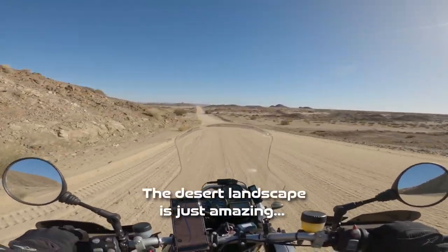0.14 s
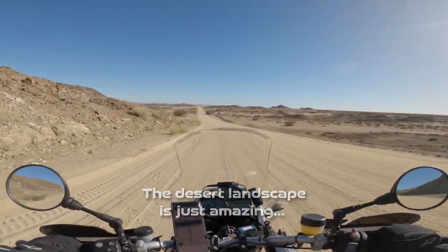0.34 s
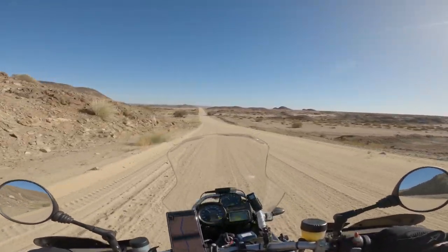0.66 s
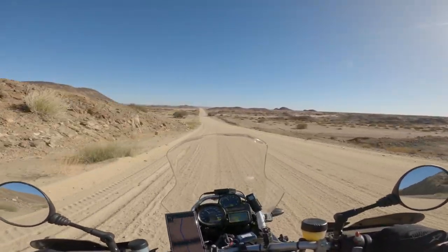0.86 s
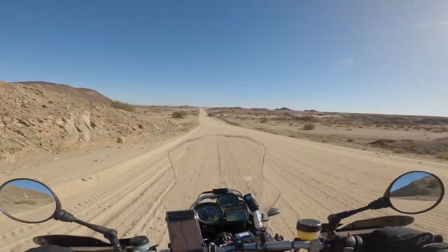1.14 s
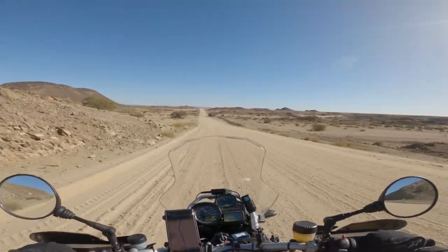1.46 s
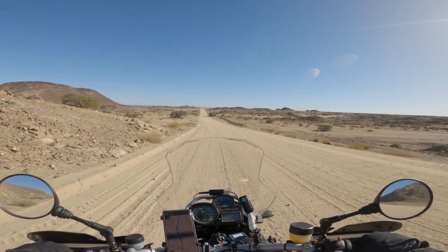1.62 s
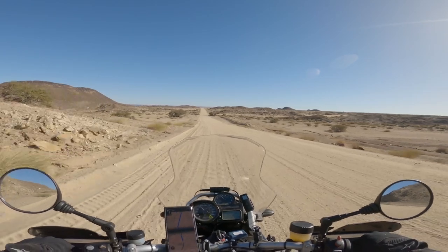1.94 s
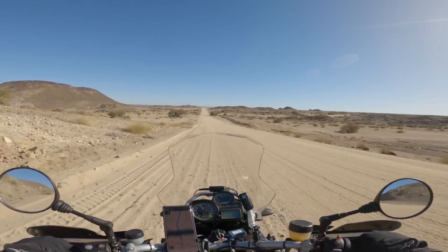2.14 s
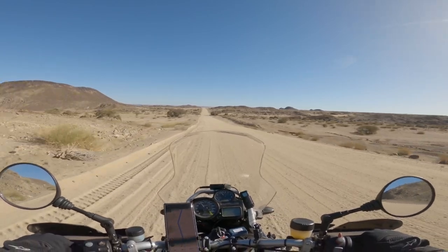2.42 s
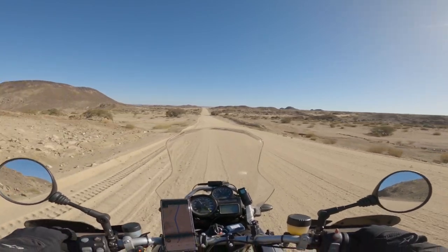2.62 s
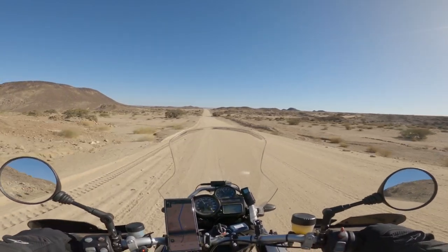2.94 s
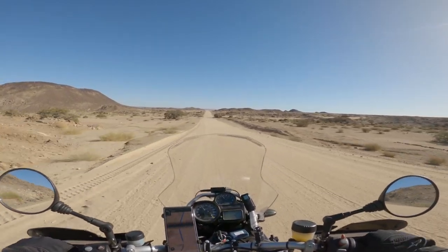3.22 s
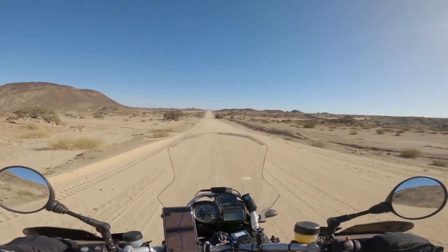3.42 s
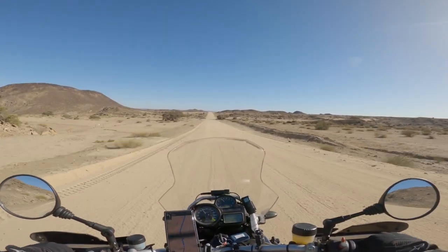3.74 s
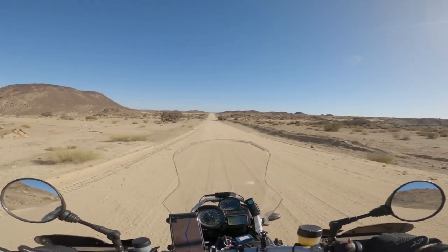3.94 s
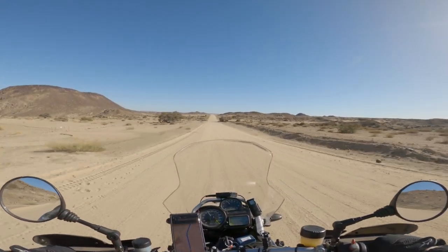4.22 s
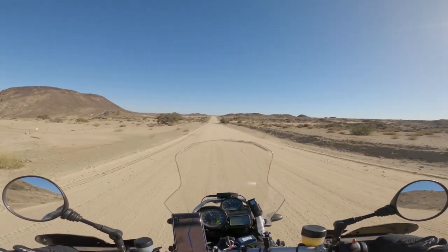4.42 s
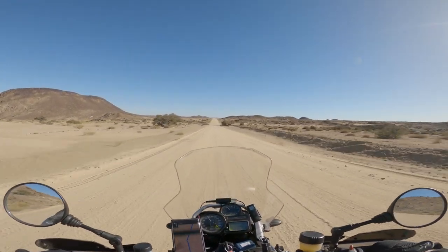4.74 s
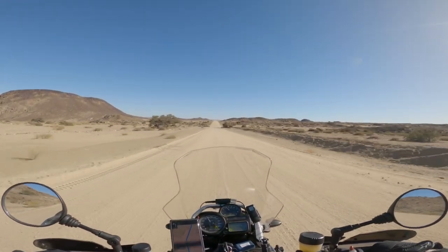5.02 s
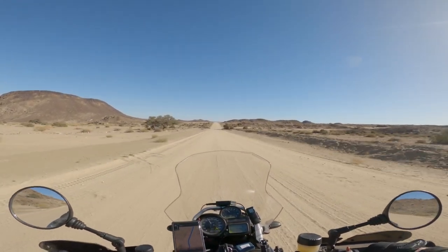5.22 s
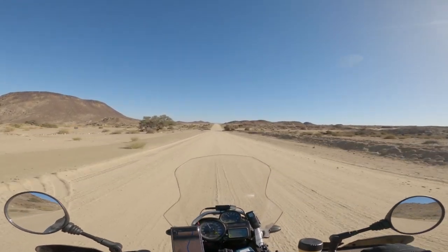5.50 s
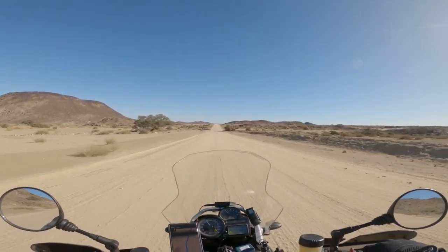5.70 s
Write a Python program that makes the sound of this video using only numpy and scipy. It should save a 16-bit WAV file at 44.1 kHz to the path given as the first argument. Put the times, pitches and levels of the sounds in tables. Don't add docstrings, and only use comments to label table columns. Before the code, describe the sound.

Onboard a motorcycle on dry gravel: low engine drone, thumping wind, gritty tyre roar, dull stone knocks, then a lower note with gear whine.

```python
import sys
import numpy as np
from scipy import signal
from scipy.fft import rfft, irfft, next_fast_len
from scipy.io import wavfile
from scipy.ndimage import uniform_filter1d, map_coordinates

SR = 44100
rng = np.random.default_rng(int(sys.argv[2]) if len(sys.argv) > 2 else 0)


def master_out(mix):
    frames = np.transpose(np.atleast_2d(mix))
    ceiling = np.clip(frames, -1, 1)
    pcm = np.round(ceiling * 32767).astype(np.int16)
    wavfile.write(sys.argv[1], SR, pcm)


def voltage_ratio(decibels):
    exponent = np.asarray(decibels, float) / 20
    return 10 ** exponent


N = 258867

# (time [s], firing rate [1/s], exhaust level [dB], whine level [dB])
ENGINE_RUN = [(0, 53.5, -30, -58), (.5, 55, -30, -58), (1.2, 56, -34, -58), (2.2, 56.5, -34, -60),
              (3.3, 57, -34, -60), (3.45, 52.2, -30, -53), (3.8, 52.5, -29, -48), (4.3, 53.1, -29, -46),
              (4.7, 53.6, -29, -47), (5.2, 54, -31, -51), (5.87, 54.6, -33, -54)]
# (frequency [Hz], level [dB per Hz])
GRIT_COLOUR = [(900, -54), (1500, 0), (2300, 1.5), (2800, -0.5), (3500, -6), (4300, -13.5), (5300, -28.5),
               (8000, -120)]
# (frequency [Hz], level [dB per Hz])
FIZZ_COLOUR = [(2500, -68), (4500, -10), (5300, -3), (6300, -2), (7500, -5), (9800, -9), (10500, -12.5),
               (12300, -16.5), (12800, -25), (13400, -18), (14000, -23), (15500, -32), (17000, -120)]


def unit(x):
    return x / np.sqrt(np.mean(x ** 2) + 1e-20)


def curves(rows):
    s, *cols = np.transpose(rows)
    return [np.interp(np.arange(N) / SR, s, c) for c in cols]


def wobble(rate):
    knots = rng.standard_normal(int(N * rate / SR) + 4)
    return map_coordinates(knots, [np.arange(N) * rate / SR])


def flutter(rate):
    x = wobble(rate)
    return unit(x - uniform_filter1d(x, size=SR // 14))


def coloured(x, spectrum):
    m = next_fast_len(N + 8192)
    hz, db = np.transpose(spectrum)
    log_hz = np.log(np.fft.rfftfreq(m, 1 / SR) + 1)
    gain = voltage_ratio(np.interp(log_hz, np.log(hz + 1), db))
    return unit(irfft(rfft(x, m) * gain, m)[:N])


def patchy(depth_db):
    z = signal.stft(rng.standard_normal(N + 512), nperseg=512)[2]
    field = uniform_filter1d(rng.standard_normal(z.shape), size=8, axis=0)
    field = uniform_filter1d(field, size=6, axis=1)
    return signal.istft(z * voltage_ratio(depth_db * unit(field)), nperseg=512)[1][:N]


def impacts(spread_db, count):
    at, size, sign = rng.random((count, 3)).T
    height = voltage_ratio(-spread_db * np.log(size + 0.013)) * np.sign(sign - .5)
    return unit(np.bincount((at * N).astype(int), height, N))


def at_random(level_db, spread_db, count):
    at, size = rng.random((count, 2)).T
    return np.c_[at * N / SR, level_db + spread_db * (2 * size - 1)]


def nearby(s, reach_s):
    span = slice(max(round((s - reach_s) * SR), 0), min(round((s + reach_s) * SR), N))
    return span, np.arange(span.start, span.stop) / SR - s


def rise(t, time_s):
    return 1 - np.exp(-t / time_s)


def wind():
    # (time [s], buffet level [dB])
    gusts = [(0, -28), (.6, -26.5), (1.2, -29), (1.8, -29), (2.4, -28), (3, -27.5), (3.4, -27),
             (3.8, -24.5), (4.3, -28), (4.8, -26), (5.3, -27), (5.87, -24.5)]
    # (frequency [Hz], level [dB per Hz])
    buffet_colour = [(4, -10), (9, -3.5), (20, -7), (40, -5), (65, -2), (100, -7.5), (150, -13), (200, -17),
                     (260, -51), (440, -120)]
    lumps = voltage_ratio(1.4 * wobble(14))
    turbulence = unit(lumps * coloured(rng.standard_normal(N), buffet_colour))
    return voltage_ratio(curves(gusts)[0] + 2.5) * turbulence


def puffs():
    # (time [s], depth [dB], width [ms])
    eddy_rows = [(0.019, -2.5, 24), (0.313, -3, 12), (0.37, -4, 14), (0.51, -8, 34), (0.598, -7, 15),
                 (0.629, -10, 34), (0.894, -5, 13), (0.921, -10, 11), (1.158, -6, 9.5), (1.335, -10, 18),
                 (1.412, -6, 21), (1.451, -3, 15), (1.606, -2.3, 8.4), (2.139, -9, 13), (2.222, -11, 27),
                 (2.251, -7, 13), (2.647, -11, 13), (2.67, -11, 25), (2.767, -7, 8), (3.134, -4.5, 4.7),
                 (3.691, -3.5, 11), (3.727, -5.5, 8.7), (3.784, -4.3, 5), (3.875, -13, 27),
                 (3.982, -13, 25), (4.009, -8.9, 12), (4.068, -3.5, 5.9), (4.158, -6, 21),
                 (4.229, -12, 22), (4.261, -8, 8.8), (4.35, 0.5, 14.4), (4.404, -6.5, 18),
                 (4.427, -4, 4.2), (4.452, -7.1, 15), (4.48, -4.5, 18), (4.61, -1, 13), (4.664, -7.8, 22),
                 (4.706, -2, 12.6), (4.756, -7, 14), (4.797, 0.5, 15), (4.855, -7, 6.9), (4.915, -4, 19),
                 (4.95, -6.9, 8.5), (5.011, -3.5, 22), (5.052, -6, 7), (5.075, -10.3, 23),
                 (5.093, -5.7, 6.7), (5.114, -5, 9.3), (5.19, -10.5, 14), (5.284, -3.5, 6.6),
                 (5.32, -2.5, 5), (5.353, 0.5, 14), (5.41, -5.3, 22), (5.462, -6, 24),
                 (5.509, -0.4, 11.6), (5.7, -1, 18),
                 (0.117, -7.5, 6), (0.154, -8, 5), (0.177, -6.5, 7.9), (0.268, -10, 7), (0.34, -9, 4.9),
                     (0.796, -15.3, 24), (0.85, -11, 8), (0.905, -16, 23), (1.141, -15.7, 25),
                     (1.212, -8, 8), (1.239, -10.2, 12), (1.275, -12, 25), (1.375, -8, 9.1),
                     (1.661, -9, 13), (1.761, -11, 33), (2.104, -13, 13), (2.286, -13.0, 11),
                     (2.429, -14, 21), (2.79, -16, 9.5), (3.082, -8, 3.6), (3.156, -8.5, 4.7),
                     (3.178, -9, 5.2), (3.228, -8, 11), (3.319, -10.8, 10), (3.351, -11, 12),
                     (3.569, -9.2, 4.4), (3.649, -9.5, 15), (3.706, -14, 7), (3.796, -5.5, 5.6),
                     (3.893, -9, 5.6), (3.922, -14, 11), (3.935, -5, 4.5), (4.088, -12.6, 10),
                     (4.141, -5.5, 5), (4.209, -12, 6.7), (4.297, -9.0, 8.2), (4.334, -8.1, 5.8),
                     (4.368, -9.2, 11), (4.39, -12, 8), (4.468, -15, 30), (4.65, -5, 5.2), (4.722, -13, 25),
                     (4.81, -9, 8), (4.875, -10, 6.5), (4.891, -11, 6.7), (4.986, -11, 21),
                     (5.132, -7.5, 5), (5.148, -6, 5), (5.226, -8, 11), (5.294, -14.7, 27),
                     (5.366, -14, 21), (5.438, -8, 4.5), (5.473, -14, 8), (5.533, -9, 7), (5.55, -5, 6),
                     (5.569, -10.5, 6.5), (5.595, -8.5, 5.3), (5.666, -6.5, 5.5), (5.827, -15, 25),
                     (5.87, -8, 4.2)]
    out = np.zeros(N)
    for s, db, ms in eddy_rows:
        span, t = nearby(s, ms / 150)
        suck = np.exp(-(t / (ms * 0.00058)) ** 2)
        rebound = np.exp(-(t / (3 * ms * 0.00058)) ** 2) / 3
        out[span] += voltage_ratio(db) * (rebound - suck)
    return out


def squeaks():
    # (time [s], peak level [dB])
    chirps = [(0.4648, -69), (0.5372, -70), (0.6469, -67), (0.6918, -73), (0.7557, -68), (1.1528, -70),
              (1.3763, -75), (3.5688, -71), (4.2552, -71), (4.349, -72), (4.4433, -73), (4.5521, -70)]
    squeak_hz, t60_s = 13320, .15
    out, t = np.zeros(N + SR), np.arange(SR // 10) / SR
    for (s, db), bend in zip(chirps, rng.standard_normal(len(chirps))):
        fade = voltage_ratio(db - 5 - 60 * t / t60_s) * rise(t, 0.003)
        tone = np.sin(2 * np.pi * squeak_hz * (1 + 0.005 * bend) * t)
        out[round(s * SR):][:len(t)] += fade * tone
    return out[:N]


def pings():
    # (time [s], peak level [dB])
    tick_rows = [(5.2444, -49), (5.3154, -48), (5.3527, -44), (5.3722, -50), (5.4016, -46), (5.4224, -48),
                 (5.4535, -48), (5.4654, -47), (5.5094, -46), (5.5308, -43), (5.5454, -48), (5.5648, -43),
                 (5.6194, -52), (5.6644, -52), (5.6915, -48)]
    centre_hz, width_hz, t60_s = 8500, 3400, .022
    out, t = np.zeros(N + SR), np.arange(SR // 50) / SR
    for (s, db), noise in zip(tick_rows, rng.standard_normal((len(tick_rows), len(t)))):
        out[round(s * SR):][:len(t)] += voltage_ratio(db - 3.0 - 60 * t / t60_s) * noise
    edges_hz = [centre_hz - width_hz / 2, centre_hz + width_hz / 2]
    band = signal.butter(2, edges_hz, "band", fs=SR, output="sos")
    return voltage_ratio(7.5) * signal.sosfilt(band, out[:N])


def tread_hum():
    # (time [s], tread block rate [1/s], hum level [dB])
    tread_run = [(0, 290, -30), (.4, 270, -32.5), (1.4, 286, -33), (2.3, 291, -39), (3.2, 290, -35.5),
                 (3.5, 273, -30.5), (3.7, 301, -35), (4.6, 312, -36), (4.9, 295, -42), (5.3, 293, -39),
                 (5.87, 270, -40)]
    hz, db = curves(tread_run)
    phase = 2 * np.pi * np.cumsum(hz) / SR + 1.03 * wobble(14)
    return np.sqrt(2) * voltage_ratio(db + 2.5 * wobble(7.6)) * np.sin(phase)


def crank():
    firing_hz = curves(ENGINE_RUN)[0] * (1 + 0.00318 * wobble(6))
    return 2 * np.pi * np.cumsum(firing_hz) / SR


def engine(turn):
    # (multiple of the firing rate [ratio], level [dB])
    firing_orders = [(1, 0.5), (2, 0), (3, -12.5), (4, -9.5), (5, -14.5), (7.5, -8.5)]
    gear_teeth = 25
    exhaust_db, whine_db = curves(ENGINE_RUN)[1:]
    exhaust = sum(voltage_ratio(db + 2.5 * wobble(5.01)) * np.sin(k * turn + k) for k, db in firing_orders)
    whine = voltage_ratio(1.3 * wobble(14) + 3.0) * np.sin(gear_teeth * turn + 1.0 * wobble(25))
    return np.sqrt(2) * (voltage_ratio(exhaust_db) * exhaust + voltage_ratio(whine_db) * whine)


def rattles():
    # (time [s], peak level [dB])
    clack_rows = [(0.2892, -31), (0.3835, -31), (0.413, -34), (0.229, -44), (1.7205, -30), (1.8218, -30),
                  (1.8726, -33), (1.928, -34), (2.387, -33), (2.4264, -29), (2.6723, -33), (3.3119, -32),
                  (3.503, -43), (4.244, -39), (4.4772, -27), (4.9561, -30), (5.0245, -26), (5.0863, -38),
                  (5.1422, -23.5), (5.1811, -33), (5.2604, -36), (5.3153, -22), (5.3562, -28),
                  (5.4261, -27), (5.459, -24), (5.4944, -26), (5.5278, -29), (5.5987, -25.5),
                  (5.6476, -29), (5.8117, -31)]
    # (time [s], peak level [dB])
    more_clacks = [(0.6175, -37), (2.134, -34), (2.1725, -32), (2.3066, -32), (2.4654, -37), (2.813, -41),
                   (3.0922, -35), (3.2191, -36), (3.268, -36), (3.4211, -33), (3.7435, -33), (3.9494, -33),
                   (4.2178, -38), (4.345, -27), (4.8516, -36), (5.1083, -32), (5.185, -35), (5.5445, -29),
                   (5.5638, -32), (5.6204, -28), (5.67, -29), (5.6994, -32), (5.7244, -31), (5.795, -27),
                   (5.8391, -33)]
    fittings_hz = [2230, 2670, 2800]
    ticks_db, sizzle_db, sizzle_follows = -41, -58, .3
    ring, spit, sizzle = np.zeros((3, N + SR))
    t = np.arange(SR // 20) / SR
    faint_ticks = at_random(ticks_db, 2.5, count=30)
    clacks = np.r_[clack_rows, more_clacks, faint_ticks]
    for (s, db), which in zip(clacks, rng.random(len(clacks))):
        hz = fittings_hz[int(which * len(fittings_hz))]
        under_db = sizzle_db + sizzle_follows * (db - ticks_db) - db
        fade = voltage_ratio(db - 60 * t / 0.023) * rise(t, 0.00023)
        start = round(s * SR)
        ring[start:][:len(t)] += fade * voltage_ratio(-4.0 - 60 * t / 0.033) * np.sin(2 * np.pi * hz * t)
        spit[start:][:len(t)] += voltage_ratio(-3.5) * fade
        sizzle[start:][:len(t)] += voltage_ratio(under_db - 1.5) * fade
    noise = rng.standard_normal(N)
    gritty = spit[:N] * coloured(noise, GRIT_COLOUR)
    bright = sizzle[:N] * coloured(noise, FIZZ_COLOUR)
    return ring[:N] + gritty + bright


def stones():
    # (time [s], peak level [dB], ring [Hz])
    large_stones = [(0.097, -2.5, 277), (0.411, 0, 392), (0.5, -8, 496), (0.812, -6, 465), (0.864, -7, 283),
                    (1.016, -4, 474), (1.11, 0.5, 283), (1.151, -2.5, 540), (1.506, -4, 439),
                    (1.872, -10, 536), (2.172, -16, 390), (2.425, -3, 476), (2.669, -3, 464),
                    (2.719, -6.5, 505), (2.489, -6, 521), (2.979, -4.5, 490), (3.188, -3, 541),
                    (3.677, -7, 412.2), (4.416, -6, 587), (3.952, -2, 416), (4.01, -5.5, 497),
                    (4.113, -6, 519), (4.289, -3.5, 500.5), (4.34, -8, 546), (4.563, -5.5, 387),
                    (4.922, 0.5, 447), (5.028, -1, 515), (5.297, -5.5, 580), (5.598, -4, 531),
                    (5.819, -2, 490)]
    # (time [s], level [dB], ring [Hz])
    small_stones = [(0.229, -13.5, 530), (0.466, -10, 358), (0.539, -19, 331), (0.564, -17, 576),
                    (1.218, -9.5, 363), (1.325, -14, 490), (1.541, -16, 402), (1.62, -11, 360),
                    (1.656, -9, 437), (1.717, -13, 380), (1.758, -15, 374), (1.834, -11, 580),
                    (1.979, -11, 387), (2.044, -12.5, 533), (2.104, -16, 563), (2.464, -14, 647),
                    (2.555, -13, 331), (2.806, -8.5, 486), (2.924, -14, 387), (3.071, -16.5, 579),
                    (3.127, -14, 412), (3.239, -13, 497), (3.322, -10, 412), (3.375, -12, 395),
                    (3.502, -9, 501), (3.568, -20, 361), (3.735, -14.5, 374), (3.778, -13, 454),
                    (3.823, -11, 516), (4.245, -11, 595), (4.478, -10, 493), (4.62, -10, 412),
                    (4.869, -10.5, 412), (4.901, -7.5, 396), (4.955, -11, 428), (5.081, -12, 509),
                    (5.142, -13, 468), (5.232, -18, 440), (5.463, -13, 519), (5.739, -11, 398)]
    small_peak_db = 5.5
    upper_mode_db, upper_spread_db = -15.5, 9
    out, t = np.zeros(N + SR), np.arange(SR // 20) / SR
    hits = np.r_[large_stones, np.add(small_stones, [0, small_peak_db, 0])]
    for (s, db, hz), (upper, share) in zip(hits, rng.random((len(hits), 2))):
        upper_db = upper_mode_db + upper_spread_db * (2 * share - 1)
        upper_fade = voltage_ratio(upper_db - 0.5 - 60 * t / 0.045)
        upper_ring = upper_fade * np.sin(2 * np.pi * (750 + 450 * upper) * t)
        ring = np.sin(2 * np.pi * hz * t) + upper_ring
        fade = voltage_ratio(db - 1.0 - 60 * t / 0.023) * rise(t, 0.0012)
        out[round(s * SR):][:len(t)] += fade * ring
    return out[:N]


def scrunches():
    # (time [s], peak level [dB])
    heaps = [(0.096, -13), (0.229, -22), (0.412, -18), (0.5, -11), (0.646, -13), (0.812, -19), (0.862, -19),
             (0.939, -18), (1.015, -17), (1.15, -11), (1.199, -22), (1.372, -16), (1.433, -17),
             (1.458, -17), (1.547, -9), (1.871, -17), (2.103, -26), (2.133, -20), (2.193, -20),
             (2.425, -11), (2.467, -15), (2.49, -13), (2.669, -11), (2.72, -12), (2.979, -16), (3.189, -13),
             (3.264, -15), (3.452, -19), (3.501, -18), (3.78, -16), (3.824, -14), (4.011, -14),
             (4.112, -10), (4.243, -17), (4.288, -18), (4.34, -16), (4.417, -13), (4.457, -21),
             (4.477, -14), (4.658, -21), (4.843, -11), (4.882, -11), (5.081, -11), (5.297, -13),
             (5.462, -6), (5.598, -13), (5.648, -11), (5.837, -9)]
    # (frequency [Hz], level [dB per Hz])
    crush_colour = [(350, -42), (550, 0), (700, 1.5), (1000, -7.5), (1400, -16.5), (1800, -24.5),
                    (3000, -27.5), (4500, -42), (7000, -120)]
    trim_db, t60_s, rise_s = -8.5, 0.039, .0006
    shape, t = np.zeros(N + SR), np.arange(SR // 12) / SR
    for s, db in heaps:
        shape[round(s * SR):][:len(t)] += voltage_ratio(db + trim_db - 60 * t / t60_s) * rise(t, rise_s)
    return shape[:N] * coloured(rng.standard_normal(N), crush_colour)


def tyres(sway, turn):
    # (time [s], level [dB])
    tyre_load = [(0.03, -41), (0.04, -45), (0.5, -42), (0.76, -45.5), (1.76, -44.5), (2.07, -48),
                 (2.2, -46), (3.54, -45.5), (3.57, -43), (4.53, -41.5), (4.61, -43.5), (5.37, -41.5),
                 (5.82, -42.5), (5.84, -41)]
    # (frequency [Hz], level [dB per Hz])
    roar_colour = [(76, -18), (130, -2), (216, -3.5), (284, -1.5), (331, -4.5), (403, -3.5), (520, -4),
                   (852, -14.5), (1190, -17.5), (1360, -19), (1600, -27), (2000, -46), (2800, -61),
                   (4000, -120)]
    cruise_db, roar_cruise_db, roar_follows, fizz_cruise_db, fizz_follows = -44.5, -22.5, 0.79, -60, 0.75
    roar_lag_s, grit_lag_s = 0.0062, .002
    grit_db, = curves(tyre_load)
    roar_db = roar_cruise_db + roar_follows * (grit_db - cruise_db)
    fizz_db = fizz_cruise_db + fizz_follows * (grit_db - cruise_db)
    jolt, throb = flutter(30), np.sin(turn)
    roar_sway = np.roll(sway, round(roar_lag_s * SR))
    grit_sway = np.roll(sway, round(grit_lag_s * SR))

    tread = patchy(depth_db=0.61) + 0.34 * impacts(spread_db=3.0, count=3500)
    roar_swell = voltage_ratio(0.32 * jolt + 0.84 * flutter(70) + 1.33 * throb - 3.3 * roar_sway)
    roar = unit(roar_swell * coloured(tread, roar_colour))

    spray = patchy(depth_db=0.25) + 0.23 * impacts(spread_db=4.0, count=6000)
    grit_swell = voltage_ratio(0.28 * jolt + 0.41 * flutter(60) + 1.1 * throb - 4.2 * grit_sway)
    grit = unit(grit_swell * coloured(spray, GRIT_COLOUR))
    fizz_swell = voltage_ratio(0.26 * jolt + 0.86 * flutter(70) + .3 * throb - 4.5 * grit_sway)
    fizz = unit(fizz_swell * coloured(spray, FIZZ_COLOUR))
    return voltage_ratio(roar_db) * roar + voltage_ratio(grit_db) * grit + voltage_ratio(fizz_db) * fizz


def shake():
    # (time of the highest crest [s], swing level [dB], length [s], ripple rate [1/s])
    ripple_stretches = [(0.026, -13.5, 0.08, 40), (0.102, -11, 0.13, 19.2), (0.242, -17, 0.14, 23),
                        (0.429, -23, 0.3, 33.4), (0.509, -22, 0.11, 21), (0.562, -12.5, 0.34, 23),
                        (0.592, -20, 0.72, 11.75), (0.736, -10, 0.62, 17.5), (0.768, -19.5, 0.21, 38.4),
                        (0.98, -18.5, 0.15, 47), (0.993, -24, 0.3, 32.8), (1.009, -22, 0.2, 24.8),
                        (1.188, -10.5, 0.42, 19.3), (1.529, -16, 0.14, 31.2), (1.612, -17, 0.66, 12.8),
                        (1.819, -20.4, 0.6, 16.7), (1.849, -7.5, 0.52, 18.5), (1.915, -15, 0.19, 39),
                        (2.185, -15, 0.06, 42), (2.194, -18, 0.8, 14.2), (2.346, -7.5, 0.27, 19.2),
                        (2.491, -16, 0.28, 24), (2.566, -11.5, 0.12, 35.2), (2.793, -8, 0.36, 18.7),
                        (2.862, -16.5, 0.31, 22.5), (3.115, -26.2, 0.7, 16.0), (3.143, -20.5, 0.36, 25.3),
                        (3.158, -22, 0.78, 12.5), (3.314, -15.5, 0.38, 18.4), (3.345, -11.5, 0.51, 21.7),
                        (3.451, -14, 0.12, 30.4), (3.524, -15.5, 0.05, 42), (3.848, -17, 0.22, 41),
                        (3.918, -21.5, 0.3, 28.8), (3.972, -13, 0.68, 18.7), (4.079, -18, 0.42, 24.4),
                        (4.114, -12, 0.058, 42), (4.538, -8, 0.051, 32.8), (5.16, -17, 0.26, 39.3),
                        (5.384, -16.2, 0.11, 40.8), (5.475, -19, 0.46, 25.8), (5.587, -17.5, 0.22, 16.0),
                        (5.722, -15.5, 0.2, 39.5), (5.837, -9.5, 0.081, 40)]
    out = np.zeros(N)
    for s, db, length, rate in ripple_stretches:
        span, t = nearby(s, 2 * length)
        swell = np.exp(-(2 * t / length) ** 2)
        out[span] += voltage_ratio(db) * swell * np.cos(2 * np.pi * rate * t)
    return out


def scene():
    sway = shake() + wind() + puffs()
    slow_sway = uniform_filter1d(sway, size=500)
    turn = crank()
    road = tyres(slow_sway, turn) + tread_hum() + scrunches() + stones() + pings()
    machine = engine(turn) + rattles() + squeaks()
    return (sway + road + machine)[None]


def band_limit(x):
    return signal.sosfilt(signal.butter(12, 15720, fs=SR, output="sos"), x)


def record(dry):
    ceiling = np.where(dry > 0, .82, .97)
    held = dry / (1 + np.abs(dry / ceiling) ** 4) ** (1 / 4)
    return band_limit(held)


dry = scene()
out = record(dry)
master_out(out)
```